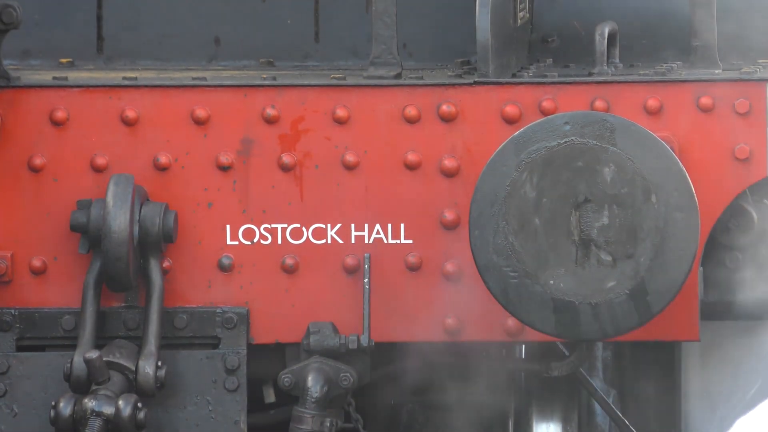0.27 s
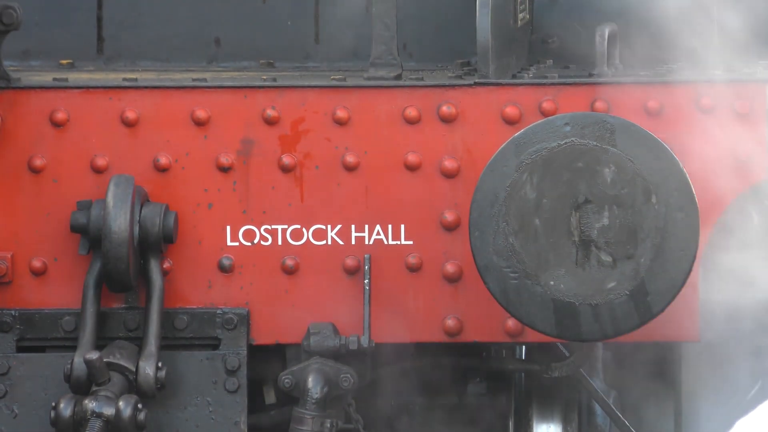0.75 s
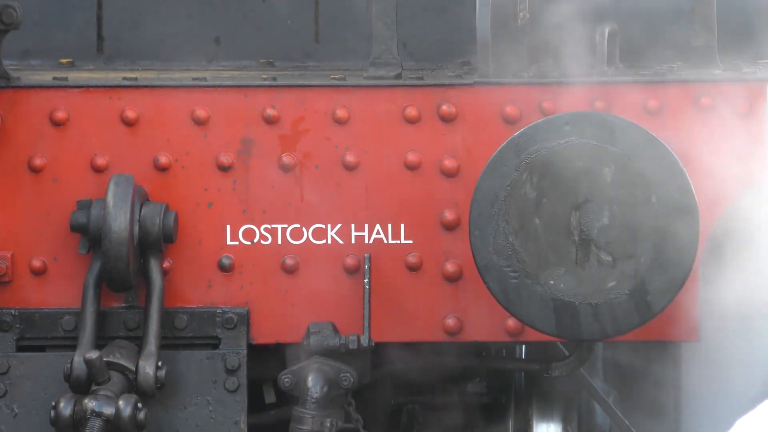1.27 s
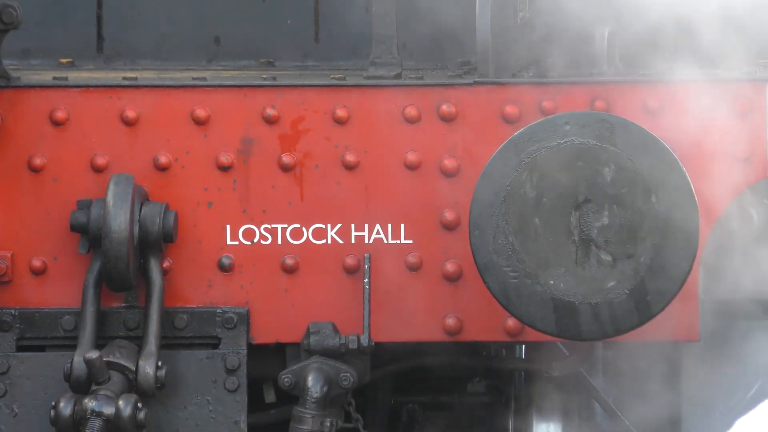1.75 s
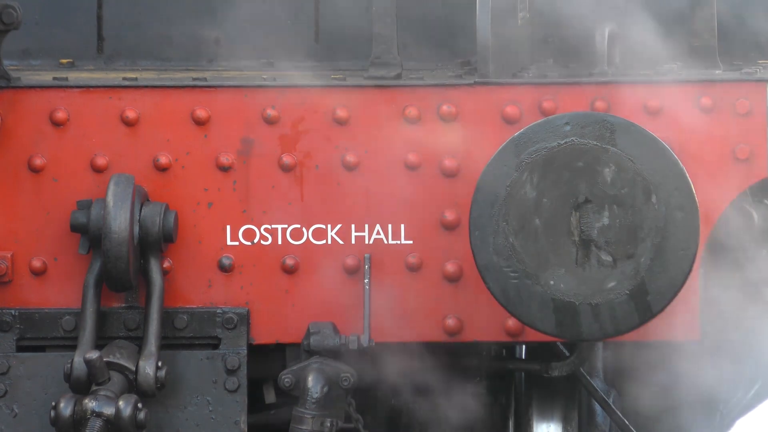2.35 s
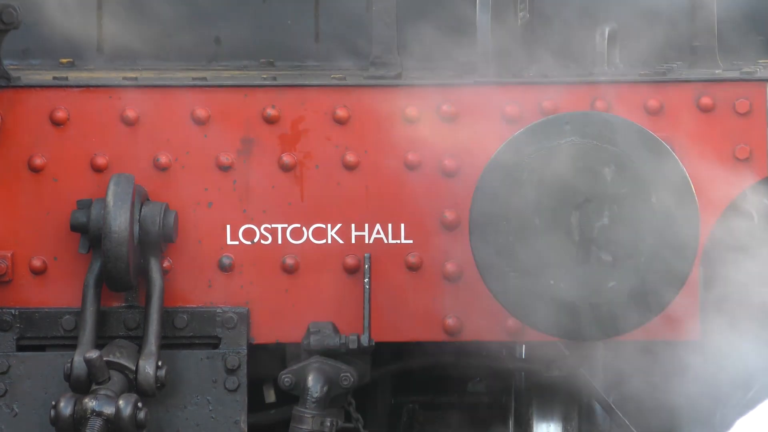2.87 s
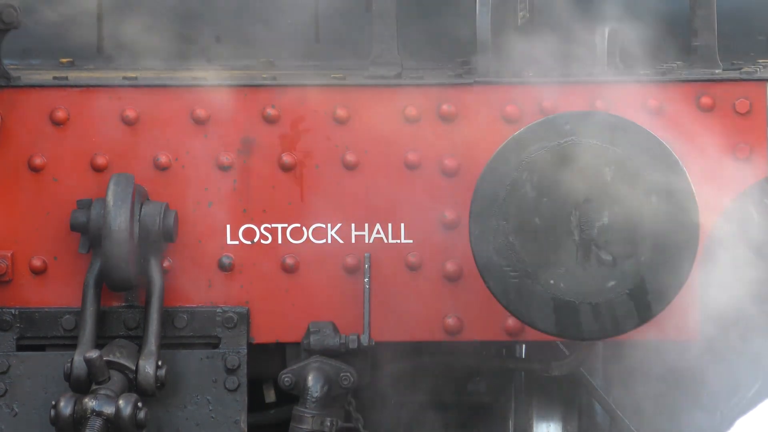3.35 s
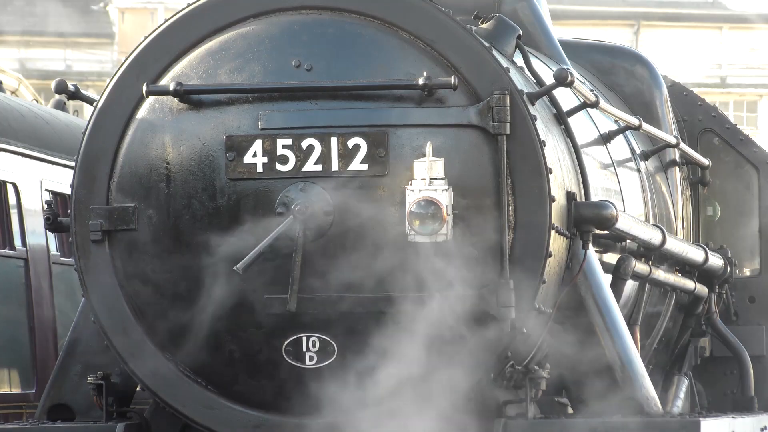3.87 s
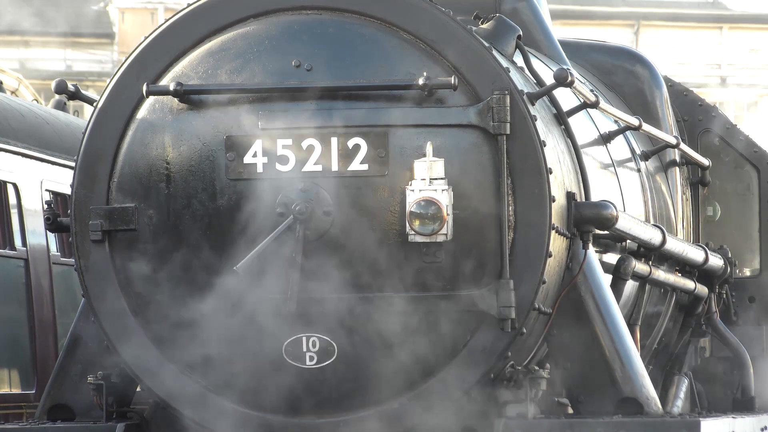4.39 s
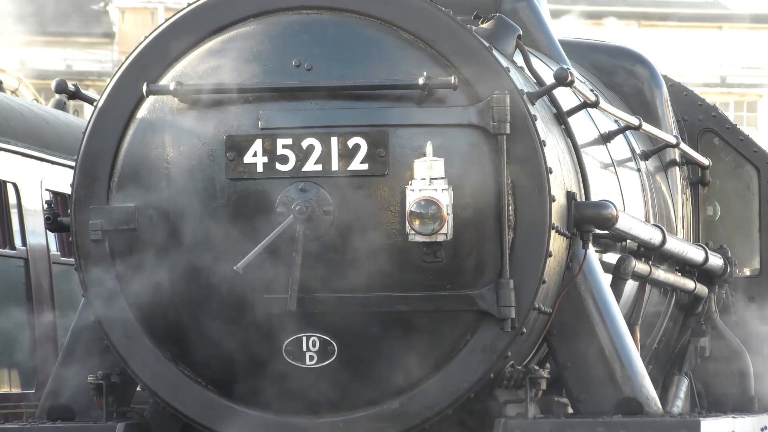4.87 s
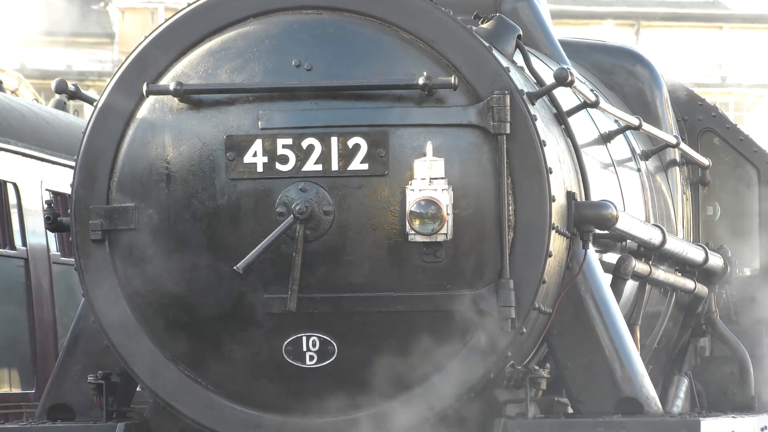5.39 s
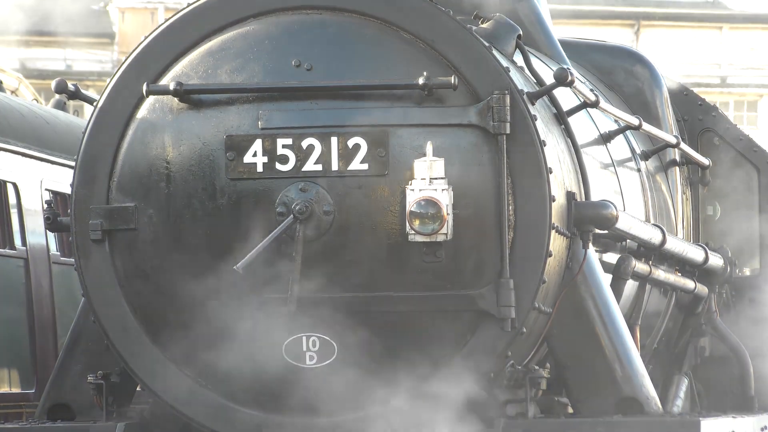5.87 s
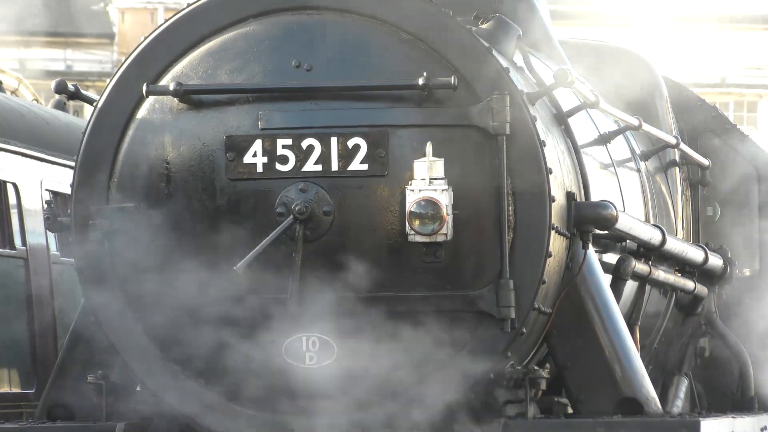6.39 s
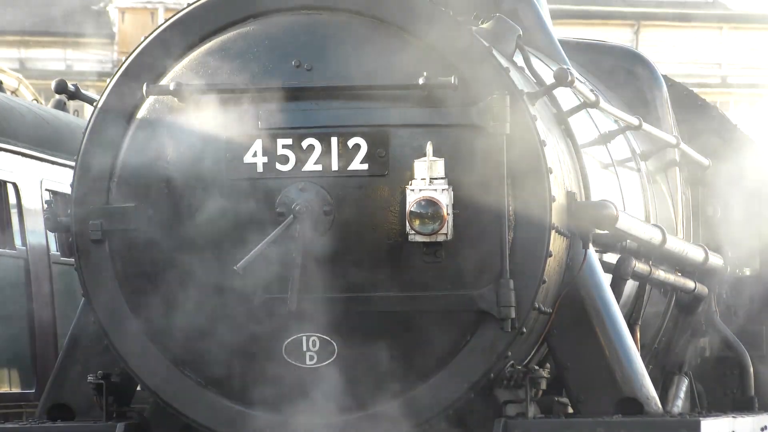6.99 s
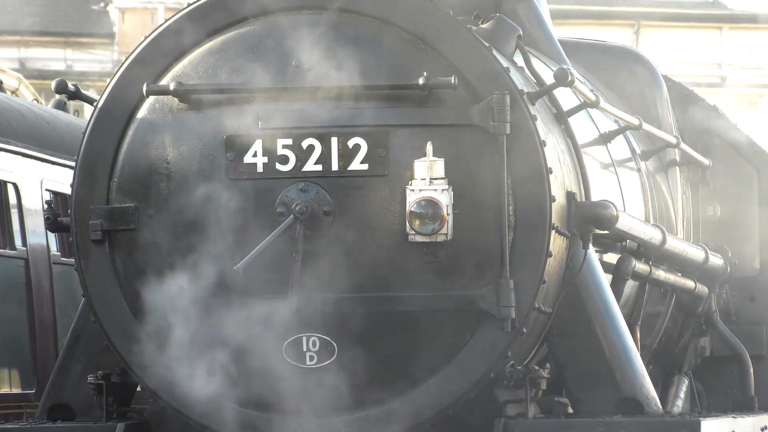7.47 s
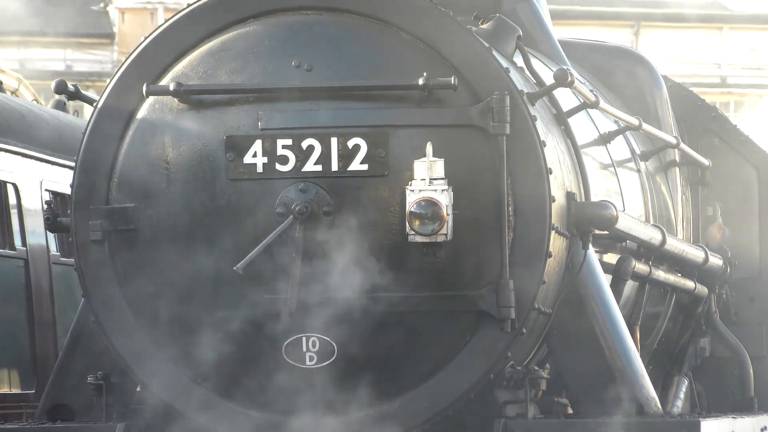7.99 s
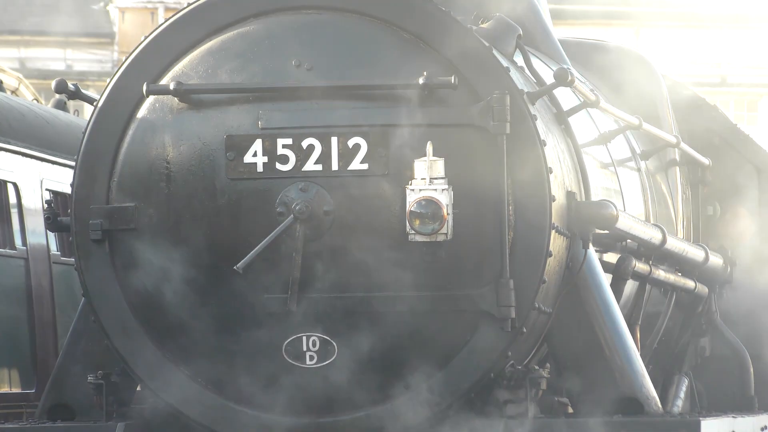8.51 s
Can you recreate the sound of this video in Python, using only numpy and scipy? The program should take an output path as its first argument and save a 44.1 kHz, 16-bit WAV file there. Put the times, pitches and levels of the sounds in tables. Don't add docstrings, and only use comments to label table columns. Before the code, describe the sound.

A standing steam locomotive hisses and roars hollowly with faint wavering whistles, while wind gusts flutter and thump against the microphone.

```python
import sys
import numpy as np
from scipy import signal
from scipy.fft import rfft, irfft, next_fast_len
from scipy.io import wavfile
from scipy.ndimage import uniform_filter1d

SR = 44100
rng = np.random.default_rng(int(sys.argv[2]) if len(sys.argv) > 2 else 0)


def dump_mix(stems):
    frames = np.atleast_2d(stems).T
    limited = np.clip(frames, -1, 1)
    pcm = np.round(limited * 32767).astype(np.int16)
    wavfile.write(sys.argv[1], SR, pcm)


def to_linear_factor(level_db):
    exponent = np.asarray(level_db, float) / 20
    return 10 ** exponent


N = 385434


def rms_one(x):
    return x / np.sqrt(np.mean(x ** 2) + 1e-20)


def in_time(rows):
    s, *columns = np.transpose(rows)
    return [np.interp(np.arange(N) / SR, s, c) for c in columns]


def swells(s, rise_db, half_s):
    out = np.zeros(N)
    for centre, db, half in np.broadcast(s, rise_db, half_s):
        first = max(0, int((centre - 3 * half) * SR))
        last = min(N, int((centre + 3 * half) * SR))
        n = np.arange(first, last)
        out[n] += db * np.exp(-((n / SR - centre) / half) ** 2)
    return out


def drift(rate):
    r = np.exp(-80 * np.pi * rate / SR)
    slow = signal.lfilter([1], [1, -2 * r, r * r], rng.standard_normal(N // 40 + 2002))
    slow = slow[2000:]
    return np.interp(np.arange(N) / 40, np.arange(len(slow)), rms_one(slow - slow.mean()))


def noise_band(low_hz, high_hz, order=2):
    sos = signal.butter(order, [low_hz, high_hz], "band", fs=SR, output="sos")
    run_in = SR // 4
    return rms_one(signal.sosfilt(sos, rng.standard_normal(N + run_in))[run_in:])


def evened(x, window_s):
    window = int(window_s * SR)
    power = uniform_filter1d(uniform_filter1d(x * x, window), window)
    return x / np.sqrt(power + 0.02)


def resonances(modes, swell_db, wander_db, wander_hz=4.9):
    swell_db = swell_db - np.median(swell_db)
    out = np.zeros(N)
    for hz, width, level_db, share in modes:
        sung = evened(noise_band(hz - width / 2, hz + width / 2), .22)
        out += to_linear_factor(level_db + share * swell_db + wander_db * drift(wander_hz)) * sung
    return out


def distant_rumble():
    return to_linear_factor(-61) * noise_band(106, 168)


def gusts():
    # (time [s], flutter level [dB], slow push above it [dB])
    wind_strength = [(0, -38, 15.5), (.2, -49.5, 23), (1.25, -52, 18.5), (1.55, -66, 26), (1.9, -51, 19.5),
                     (2.8, -60.5, 29), (3.03, -68, 23), (3.6, -56.5, 23.5), (4.6, -53, 24),
                     (5.2, -59.5, 25), (5.7, -51.5, 23), (6.1, -63, 24.5), (6.4, -38.5, 15),
                     (7.0, -45.5, 24), (7.35, -58, 24), (7.75, -58, 25.5), (8.08, -36, 16.5),
                     (8.74, -63.5, 30)]
    # (centre [s], push rise [dB], flutter rise [dB], half length [s])
    eddies = [(.01, 11.5, 0, 0.031), (.33, 8, -9, 0.052), (0.558, 2.5, 3, .05), (0.907, 11, 1, 0.049),
              (1.06, 7, -1.5, .035), (1.204, 8.5, 8, 0.046), (1.645, 7, .3, 0.045), (1.936, 12, 8, .055),
              (2.15, 14.5, 4, 0.061), (2.4, 5, 1, 0.068), (3.42, 13, -1, 0.078), (3.72, -4, 4, .09),
              (3.87, 10, 4, 0.035), (4.114, 3, -4, 0.033), (4.308, 7.5, 2, .045), (4.497, 6, 4, .045),
              (4.687, 10, 12, .045), (4.87, 12, 3, .05), (5.07, 8, 1, .04), (5.294, 9, 1, .04),
              (5.624, 7, 12, 0.17), (6.28, 6, 6, 0.033), (6.45, 8, 11.5, 0.056), (6.618, 12, 11, .06),
              (6.783, 8, 4, 0.056), (7.22, 7, 6, 0.034), (7.54, 7, 6, .055), (7.833, 9, 8, 0.044),
              (8.253, 9.5, 7, 0.032), (8.36, 12, 8, 0.042)]
    strength_db, push_over_db = in_time(wind_strength)
    s, push_rise_db, flutter_rise_db, half_s = np.transpose(eddies)
    push_db = strength_db + push_over_db + swells(s, push_rise_db, half_s)
    return push_db, strength_db + swells(s, flutter_rise_db, half_s)


def wind():
    # (time [s], size [dB], swing time [s], negative = push first)
    buffets = [
        (0.9, -21, -0.017),
        (4.692, -26.5, 0.013),
        (6.435, -15.5, 0.011),
        (6.533, -14.5, 0.0103),
        (6.672, -15.5, -0.015),
        (6.879, -17, 0.018),
        (8.102, -8.5, 0.013),
        (8.321, -18.5, 0.026),
    ]
    push_db, flutter_db = gusts()
    push = to_linear_factor(push_db - 6.5) * evened(noise_band(4, 19), .07)
    push = signal.sosfiltfilt(signal.butter(2, 30, fs=SR, output="sos"), push)
    flutter = rms_one(noise_band(29, 50.6) + 0.43 * noise_band(57, 95))
    flutter = to_linear_factor(flutter_db + 2.5) * evened(flutter, 0.05)
    flutter = signal.sosfilt(signal.butter(2, 110, fs=SR, output="sos"), flutter)
    out, t = push + flutter, np.arange(N) / SR
    for s, size_db, swing in buffets:
        u = (t - s) / swing
        reach = np.where(u * swing < 0, 1.6, 3.2)
        thump = np.sin(1.9 * np.sign(u) * np.abs(u) ** .8) * np.exp(-(u / reach) ** 2)
        out = out * (1 - 0.78 * np.exp(-(u / 1.8) ** 2)) + to_linear_factor(size_db) * thump
    return out


def drops():
    # (time [s], peak level [dB])
    spat_drops = [
        (7.2568, -31),
    ]
    out = np.zeros(N)
    for s, peak_db in spat_drops:
        out[round(s * SR)] = to_linear_factor(peak_db + 14)
    return signal.sosfilt(signal.butter(3, [4800, 8800], "band", fs=SR, output="sos"), out)


def jet_controls():
    # (time [s], hiss level [dB], wetness [dB])
    leak_pressure = [(0, -50, 1), (.3, -54.5, 1), (.6, -53, 2), (.85, -55, 1), (1.6, -56.5, 0.7),
                     (2.0, -55, 3), (2.5, -51.5, 1.5), (2.9, -51.5, -1.5), (3.15, -54, .3),
                     (4.55, -54.5, 0), (5.3, -52, -0.3), (5.6, -54.5, -3), (6.35, -54.5, 0),
                     (6.6, -51.5, -1), (7.5, -50, 0), (8.1, -52.5, -0.8), (8.5, -56, 1), (8.74, -57, .3)]
    # (centre [s], rise [dB], half length [s], extra fine spray [dB])
    spurts = [(.01, 1.5, .02, 2), (0.068, 2, 0.026, 0), (0.493, 2.5, 0.035, 1), (.68, 6, .025, -9),
              (1.045, 4.5, 0.017, 0), (1.762, 6.5, 0.018, -4), (1.848, 7.5, 0.024, -4),
              (1.94, 10.5, 0.049, -1), (2.04, 6.5, 0.037, -5), (2.185, 1.5, 0.022, -6), (2.707, 2, .03, 4),
              (2.798, 5.5, 0.027, 1), (2.91, 4.5, .03, -1), (2.992, 6, 0.047, -5), (3.394, 2, 0.012, 1),
              (4.007, 0, 0.055, 1.5), (4.684, 4, .03, -2), (4.853, 4.5, 0.055, -5), (5.21, 1.5, .06, 5),
              (5.347, 4, .04, 2.5), (5.943, 3, .02, 3), (6.513, 3, 0.043, -1.5), (6.713, 4, 0.082, -3),
              (6.96, 4, 0.036, -3), (7.505, 2.5, .03, 0), (7.573, 5, 0.022, -3), (7.833, 3.5, 0.035, -2),
              (7.994, 2.5, 0.025, 0), (8.66, 4, 0.03, -6), (8.73, 1.5, .02, 0)]
    s, rise_db, half_s, fine_db = np.transpose(spurts)
    spurt_db = swells(s, rise_db, half_s)
    hiss_db, wet_db = in_time(leak_pressure)
    spray_db = swells(s, fine_db, 1.3 * half_s)
    body_db = wet_db + 1.47 * drift(8.7) - 0.4 * spurt_db
    return hiss_db + spurt_db, spray_db, body_db


def leak():
    # (frequency [Hz], level per Hz [dB])
    jet_spectrum = [(300, -3.5), (1300, 2.5), (2300, -5), (3100, -2.5), (4500, -3.5), (5500, -2.5),
                    (6600, -2), (7900, -0.5), (8800, -3.5), (9400, -11), (10500, -19), (12600, -14.5),
                    (14400, -21), (16000, -22)]
    # (frequency [Hz], width [Hz], rms level [dB], share of the hiss swell [dB per
    # dB])
    hiss_peaks = [(4904, 125, -66, 0.86), (5314, 130, -65, 1.05), (5690, 420, -63.5, 1.35),
                  (6067, 105, -66, 0.86), (6480, 130, -69, 1), (4506, 180, -69, 0.8)]
    hiss_db, spray_db, body_db = jet_controls()
    spray_db = spray_db - np.median(spray_db)
    body_db = body_db - np.median(body_db)
    size = next_fast_len(N)
    hz = np.fft.rfftfreq(size, 1 / SR) + 1
    hz_points, db_points = np.transpose(jet_spectrum)
    shape = to_linear_factor(np.interp(np.log(hz), np.log(hz_points), db_points)) * (hz > 300)
    jet = rfft(rng.standard_normal(size)) * shape
    out, centres = np.zeros(N), np.geomspace(1500, 14000, 12)
    for k, centre in enumerate(centres):
        band = irfft(jet * np.interp(hz, centres, np.arange(12) == k), size)[:N]
        spray = np.clip((centre - 8000) / 3000, 0, 1) * spray_db
        body = np.clip((5000 - centre) / 1200, 0, 1) * body_db
        out += to_linear_factor(spray + body + 1.2 * drift(8.0)) * band
    sputter_db = 0.67 * drift(31) + 0.85 * drift(48)
    peaks = resonances(hiss_peaks, hiss_db, wander_db=2.5, wander_hz=7.4)
    return to_linear_factor(sputter_db) * (to_linear_factor(hiss_db + 2.0) * rms_one(out) + peaks)


def blower_pressure():
    # (time [s], level [dB])
    pressure = [(0, -1), (.3, 3), (.85, -0.5), (1.5, -1.5), (2.25, -7), (2.5, -0.5), (3.4, -3), (4.05, 2),
                (4.45, -0.5), (5.6, 2), (6.1, -2), (6.65, 9.5), (7.05, 6.5), (7.35, 13), (7.7, 12.5),
                (8.0, 8.5), (8.3, 3), (8.74, 2.5)]
    return in_time(pressure)[0]


def bleed_opening():
    # (centre [s], rise [dB], half length [s])
    breaths = [(0, 10, 0.19), (0.597, 3.5, 0.25), (1.35, 4.5, 0.2), (1.948, 8, 0.19), (2.75, 5, 0.46),
               (3.6, 2, .15), (4.096, 2.5, .12), (4.747, 7, 0.32), (5.55, 2.5, 0.13), (6.35, 5, 0.22),
               (6.902, 6, 0.087), (7.44, 3, .1)]
    shuts_s, shuts_db_per_s = 7.1, 5
    t = np.arange(N) / SR
    return swells(*np.transpose(breaths)) - shuts_db_per_s * np.maximum(t - shuts_s, 0)


def bypass():
    # (frequency [Hz], width [Hz], rms level [dB], share of its swell [0-1])
    bypass_modes = [(1911, 78, -58.5, 0.82)]
    opens_s, shut_db = 1.75, -6.5
    t = np.arange(N) / SR
    shut = np.clip((opens_s - t) / .2, 0, 1)
    bypass_db = 0.63 * bleed_opening() + 0.47 * blower_pressure() + shut_db * shut
    return resonances(bypass_modes, bypass_db, wander_db=2.7)


def bleed_valve():
    # (frequency [Hz], width [Hz], rms level [dB], share of its swell [0-1])
    bleed_modes = [(2042, 92, -61, 1), (2127, 106, -63, 0.9)]
    return resonances(bleed_modes, bleed_opening(), wander_db=2.4)


def blower_overtone():
    # (frequency [Hz], width [Hz], rms level [dB], share of its swell [dB per dB])
    overtone_modes = [(2285, 100, -71, 0.9), (2448, 98, -68.5, 0.9), (2559, 82, -64.5, 1.04)]
    # (centre [s], rise [dB], half length [s])
    overblows = [(.05, 4, 0.13), (.5, 7.5, 0.36), (1.3, 2.5, .15), (1.9, 4, .22), (2.7, 7.5, 0.25),
                 (4.9, 4, .4), (5.503, 7, 0.13), (6.48, 11.5, 0.11), (6.9, 9, 0.35), (7.546, 15, 0.35),
                 (7.923, 6.5, 0.16), (8.5, 4, 0.22)]
    overtone_db = swells(*np.transpose(overblows))
    return resonances(overtone_modes, overtone_db, wander_db=2.3, wander_hz=9.2)


def blower_pipe():
    # (frequency [Hz], width [Hz], rms level [dB], share of the whistle swell [dB per dB])
    pipe_modes = [(1480, 110, -64, 0.4), (1573, 48, -59.5, 1.11), (1688, 87, -63.5, 0.8),
                  (1796, 52, -63.5, 0.73), (2820, 99, -67, 0.2), (3327, 154, -67, 0.74),
                  (3750, 210, -65, 0.24), (4125, 200, -72.5, 0.4)]
    return resonances(pipe_modes, blower_pressure(), wander_db=1.66, wander_hz=6.5)


def draught():
    # (frequency [Hz], width [Hz], rms level [dB], share of the draught swell [dB per dB])
    cavity_modes = [(213, 53.4, -49, 0.15), (259.7, 29, -55, 0.02), (307.4, 31, -56.5, 0.16),
                    (340.4, 32.7, -54.5, 0.01), (499, 190, -57.5, 0.26), (687.4, 44.7, -51.5, 0.81),
                    (752, 55, -52, 1.1), (797, 61, -52.5, 1.1), (850, 59.5, -46, 0.73), (918, 46, -56, 0.7)]
    # (frequency [Hz], width [Hz], rms level [dB], share of its swell [0-1])
    throat_modes = [(1075.6, 52, -53.5, 0.72), (1138.6, 30, -56.5, 0.8), (1193.4, 49.5, -50.5, 0.74),
                    (1324, 58, -68, 0.3)]
    # (time [s], level [dB])
    draught_level = [(0, -43.5), (1.2, -43.5), (1.5, -48), (2.0, -44), (3.5, -45), (4.9, -42.5),
                     (5.6, -42.5), (6.2, -41.5), (6.55, -34.5), (7.2, -37), (7.4, -34.5), (8.1, -37.5),
                     (8.25, -39.5), (8.74, -41.5)]
    # (centre [s], smokebox rise [dB], throat rise [dB], half length [s])
    surges = [(0.126, 2.5, 5.5, 0.045), (0.393, 0, 7, 0.11), (0.647, -2, 3, 0.098), (1.04, 4, 3, 0.033),
              (1.258, 2, 5, 0.034), (1.44, -1.5, 3, .06), (1.933, 1, 5, 0.081), (2.387, 3.5, 4, .04),
              (2.655, 2.5, 4, 0.059), (2.847, 3.5, -4, 0.074), (3.028, 1.5, 4, .05), (3.167, 6.5, -1, .07),
              (3.34, -5.5, 1, 0.025), (3.996, 1, -2, .12), (4.89, 0.5, 5, 0.076), (5.2, 5.5, 1, 0.11),
              (5.342, 2, 4, .05), (5.796, 3, 5, 0.029), (6.157, 2.5, 7, 0.063), (6.597, -0.5, 3, 0.066),
              (6.72, 2, 2.5, 0.07), (6.997, 1.5, 8, .04), (7.196, 3, 7, 0.027), (7.417, 3.5, 6, .05),
              (7.57, 1, 1.5, .03), (7.775, 2, 0, .03), (7.97, 3.5, 0, 0.056), (8.216, -5.5, -6, 0.048),
              (8.45, 1, 1.5, 0.14)]
    t = np.arange(N) / SR
    roar_db, = in_time(draught_level)
    s, roar_rise_db, throat_rise_db, half_s = np.transpose(surges)
    throat_db = 0.56 * roar_db - 0.58 * t + swells(s, throat_rise_db, half_s)
    roar_db = roar_db + swells(s, roar_rise_db, half_s)
    smokebox = resonances(cavity_modes, roar_db, wander_db=1.35, wander_hz=4.0)
    throat = resonances(throat_modes, throat_db, wander_db=1.15, wander_hz=5.4)
    return smokebox + throat


def scene():
    background = distant_rumble() + wind()
    steam = leak() + drops()
    pipes = bypass() + bleed_valve() + blower_overtone() + blower_pipe()
    return (background + steam + pipes + draught())[None]


def low_pass(x):
    return signal.sosfilt(signal.butter(12, 15620, fs=SR, output="sos"), x)


def record(dry):
    return low_pass(dry)


dry = scene()
out = record(dry)
dump_mix(out)
```